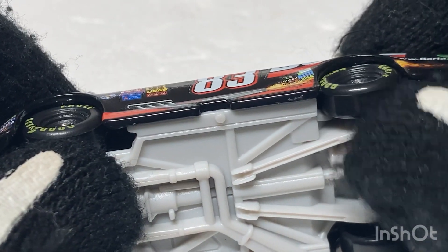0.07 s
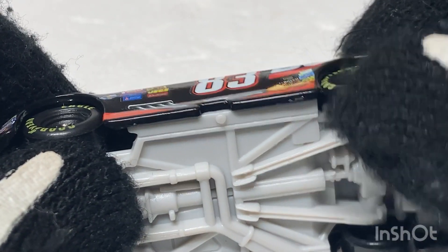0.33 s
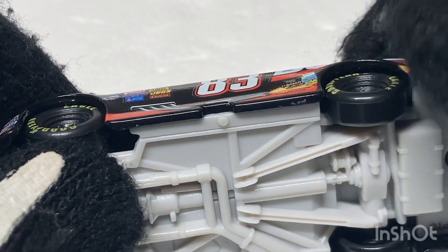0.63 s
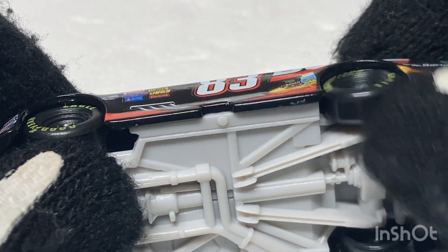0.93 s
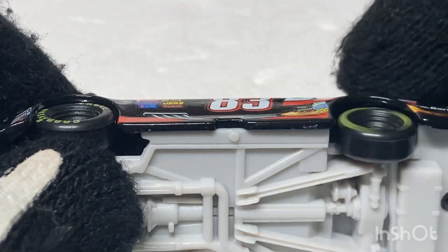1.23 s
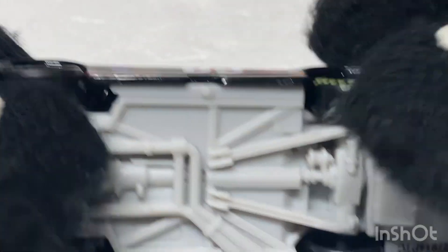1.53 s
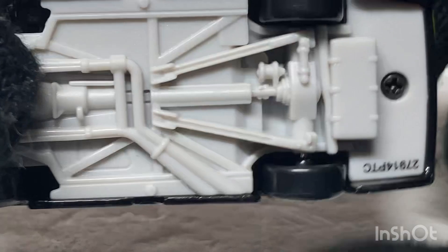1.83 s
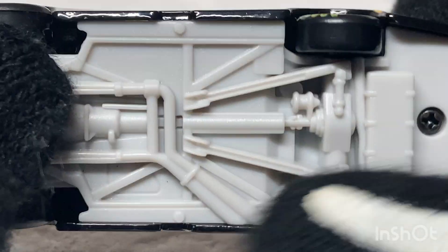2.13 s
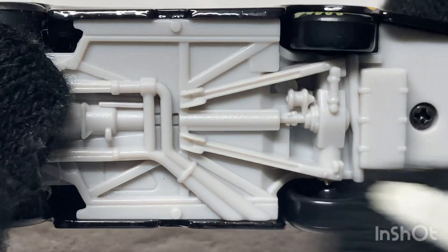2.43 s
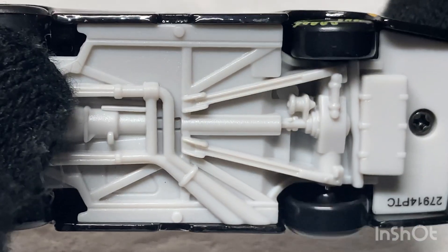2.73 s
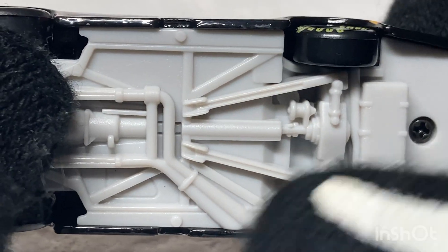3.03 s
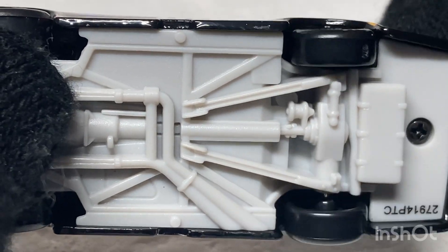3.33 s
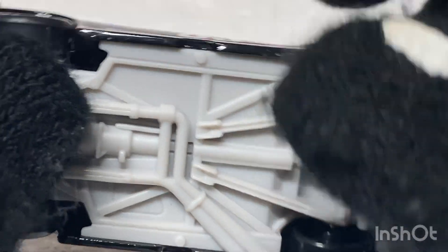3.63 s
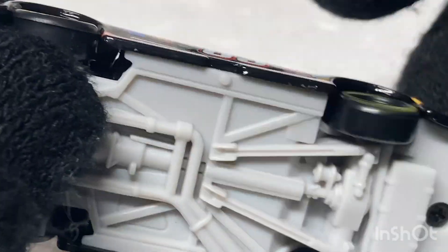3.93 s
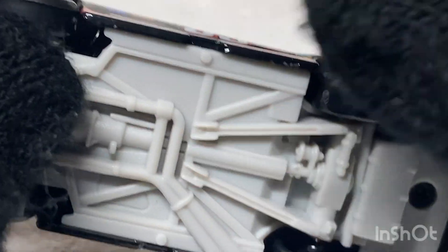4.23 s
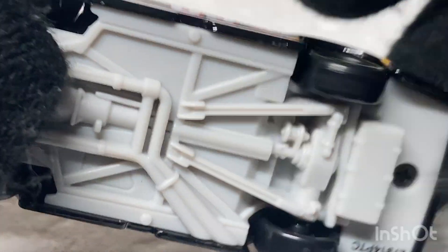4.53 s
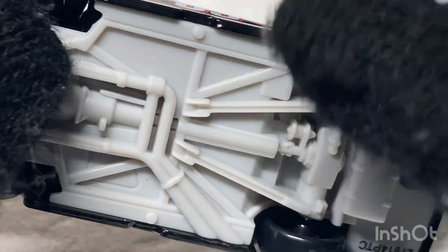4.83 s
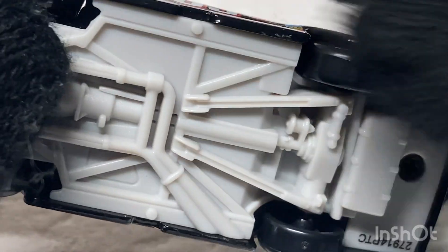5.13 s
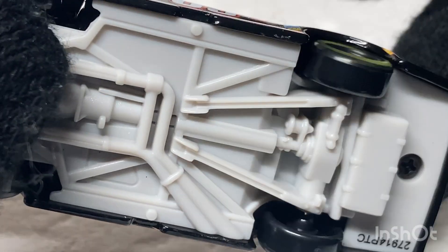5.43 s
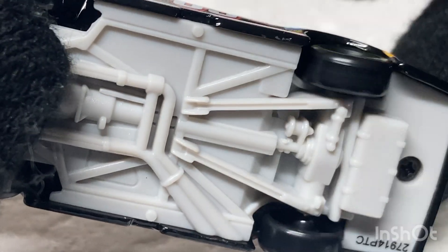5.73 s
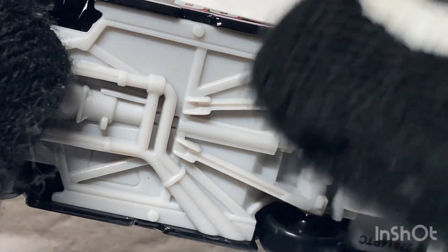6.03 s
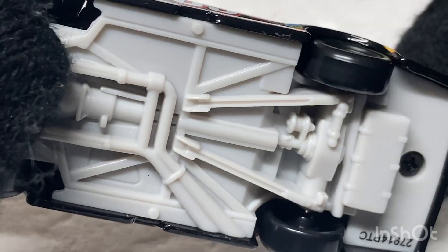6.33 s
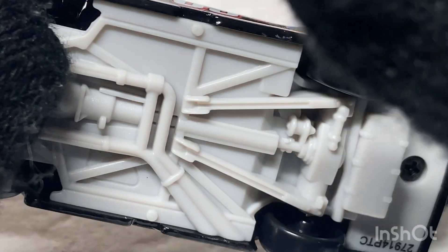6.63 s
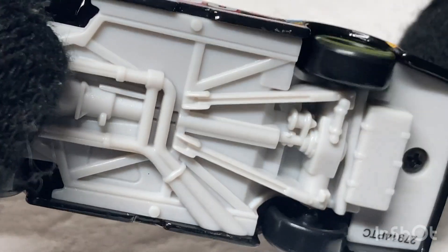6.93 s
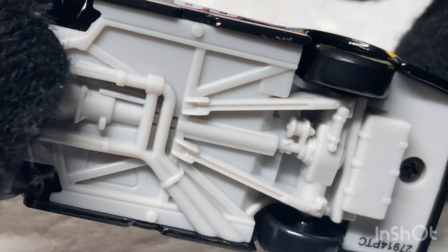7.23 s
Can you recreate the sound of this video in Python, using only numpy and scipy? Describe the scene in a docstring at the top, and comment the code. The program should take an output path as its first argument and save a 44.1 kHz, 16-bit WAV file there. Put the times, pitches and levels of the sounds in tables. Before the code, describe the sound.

A small metal toy car is handled close to the microphone in a small room with a faint, steady low hum. In the first second, knit gloves scuff faintly and a loose axle gives a few light clicks. At about 1.1 seconds a finger flicks a plastic wheel, making a sharp double clack and a very brief rattle. A glove brushes softly over the body around 1.6 seconds. Three gentler flicks follow at 2.1, 2.5 and 3.1 seconds, each spinning down in a fine, ticking rattle lasting about half a second. After another soft brush, louder flicks come at 3.8, 4.4, 4.9, 5.2, 5.7, 6.1 and 6.8 seconds. Each has a bright clack with quick rebounds, a soft low hand thud and a short fading rattle, with stray axle clicks between. The last spin runs down at about 7.3 seconds.

```python
"""Flicking the wheels of a toy car

A small room with a faint hum; a phone's two microphones stand close to a die-cast car in gloved hands.
Again and again a finger catches a plastic wheel and lets go: the loose axle clacks and rebounds, the
hand thuds softly, and the wheel spins with a fine rattle and runs down. Knit gloves brush the body."""
import sys
import numpy as np
from scipy import signal
from scipy.fft import rfft, irfft, next_fast_len
from scipy.io import wavfile
from scipy.ndimage import uniform_filter1d, map_coordinates

SR = 44100
rng = np.random.default_rng(int(sys.argv[2]) if len(sys.argv) > 2 else 0)


def wrap_up_sound(samples):
    """Save the sound to the file named by the first command line argument, as 16-bit audio."""
    columns = np.atleast_2d(samples).T
    # keep every value between -1 and 1, then stretch to whole-number steps
    tamed = np.clip(columns, -1, 1)
    steps = np.round(tamed * 32767).astype(np.int16)
    wavfile.write(sys.argv[1], SR, steps)


N = 321003
T = np.arange(N) / SR

# Levels in the tables are relative; each layer sets its own gain.
# The room's hum. Each row: frequency in Hz, level in dB.
HUM_TONES = [(87.2, -74), (174.3, -60)]
# Noise spectra. Each row: frequency in Hz, spectral density in dB.
ROOM_TONE_SPECTRUM = [(20, -25.5), (45, -10.5), (80, 1.5), (130, -0.5), (210, -3), (300, -5.5), (420, -14),
                      (600, -15), (900, -29.5), (1500, -33), (3000, -37.5), (6000, -43), (11000, -39.5),
                      (16000, -49.5)]
KNIT_SPECTRUM = [(250, -25.5), (450, 5), (650, 4.5), (1000, -2), (1300, -2.5), (1650, 1.5), (2200, -4.5),
                 (4000, -7.5), (6000, -11.5), (8000, -8.5), (12000, -7.5), (16000, -13.5)]
SCUFF_SPECTRUM = [(600, -22), (1400, 15.5), (2300, 21), (4200, -1), (5500, -21), (12000, -8), (16000, -35)]
THUD_SPECTRUM = [(20, -42), (33, -17), (48, -0.5), (75, 1), (120, -11), (240, -8.5), (400, -44),
                 (1000, -84.5)]
# Room tone across the microphones. Each row: frequency in Hz, left-right correlation.
ROOM_TONE_LIKENESS = [(100, 0.88), (250, 0.72), (600, 0.64), (1500, .1), (8000, 0.19)]
# The fingers shift their grip. Each row: time in seconds, level in dB.
GRIP_LEVELS = [(0.0, -66.5), (0.268, -62.5), (0.412, -73), (0.7, -89)]
# A glove strokes the body. Each row: middle in seconds, half length in seconds, level in dB.
GLOVE_STROKES = [(1.581, 0.13, -54), (2.07, 0.046, -69.5), (3.028, 0.041, -76), (3.708, .055, -58.5),
                 (4.385, 0.047, -69.5)]
# The loose axle clacks as the car tilts or a wheel wobbles.
# Each row: time in seconds, level in dB, treble over body in dB.
AXLE_CLACKS = [(0.0338, -51.5, -24), (0.1572, -59.5, -22), (0.239, -52, -22), (0.3704, -40.5, -10.5),
               (0.406, -51, -1), (0.726, -38, -1.5), (0.9195, -27.5, 6), (0.9496, -30.5, 6),
               (1.0027, -38, -10), (1.0125, -32.5, 9), (1.0187, -36, 3), (1.2246, -43.5, -8),
               (1.3317, -40.5, -1.5), (2.2303, -35.5, 6.5), (2.3707, -32, 4.5), (2.4519, -40.5, 7.5),
               (2.5785, -39, 13), (2.6445, -34.5, 6.5), (2.6851, -39.5, 4), (2.905, -50, 4),
               (2.9239, -47.5, -1.5), (3.0976, -38, -5.5), (3.1149, -32.5, 7), (3.1631, -39, 4),
               (3.3478, -46.5, 2), (4.6144, -44.5, 0), (4.9716, -37, 1.5), (5.36, -35.5, 3),
               (5.7409, -32, 6.5), (5.8685, -39.5, 13), (6.1127, -21.5, 7.5), (6.1672, -37.5, 6),
               (6.8773, -35.5, 11), (6.9008, -31.5, 5.5), (7.172, -46.5, 6)]
# A fingertip drags. Each row: middle in seconds, half length in seconds, pitch in Hz, level in dB.
FINGER_DRAGS = [(0.313, 0.022, 746, -68.5), (1.673, 0.052, 652, -58.5), (1.605, 0.082, 1650, -68.5),
                (3.087, 0.026, 1306, -65), (3.732, .04, 774, -66.5), (4.371, 0.018, 635, -65)]
# The shell is knocked. Each row: time in seconds, level of the hollow in dB, level of the rim in dB.
SHELL_KNOCKS = [(0.7244, -42, -61), (0.921, -50, -34.5), (0.9501, -39.5, -54), (1.0005, -57, -46.5),
                (1.019, -61, -44), (1.1337, -40, -45.5), (1.1632, -54, -37.5), (1.224, -49, -47.5),
                (1.3329, -45.5, -59), (2.136, -53.5, -38), (3.135, -60, -53), (5.233, -54, -28)]
# A finger flicks a wheel. Each row: catch in seconds, its level in dB, release in seconds, its level in
# dB, rebound gap in seconds, loss per rebound in dB, treble over body in dB, spin length in seconds,
# rattle level in dB, metal ring over rattle in dB, hand thud in dB.
WHEEL_FLICKS = [(1.1318, -21, 1.1655, -21, 0.0077, 7, 4, .18, -46.5, -6, -58),
                (2.137, -33.5, 2.1791, -24.5, 0.0063, 3, 7, 0.55, -53.5, -2, -75),
                (2.548, -29, 2.5959, -32, .0235, 17, 0.5, 0.51, -57.5, -3, -62.5),
                (3.134, -33.5, 3.1812, -30.5, 0.028, 20, 4.5, 0.52, -56, -1, -64),
                (3.8074, -16.5, 3.8476, -21, .0063, 4, 8.5, .38, -46, -25, -61),
                (4.4298, -19, 4.4847, -19.5, 0.015, 4, 8.5, 0.25, -52, -20, -61.5),
                (4.8696, -21.5, 4.8987, -21, 0.034, 11.5, 6, 0.28, -51, -12, -56),
                (5.2318, -16.5, 5.255, -27, .0115, 7, 9, 0.46, -45, -25.5, -56),
                (5.6621, -17.5, 5.678, -27, 0.0076, 3.5, 9.5, 0.44, -45, -24.5, -58.5),
                (6.0743, -21, 6.1017, -22.5, .0058, 6.5, 7, 0.43, -46, -17, -57),
                (6.815, -20, 6.8375, -26, 0.0053, 1.6, 9, 0.47, -46, -27, -54.5)]
# The car's resonances. Each row: frequency in Hz, width in Hz, level in dB, left over right in dB.
CHASSIS_MODES = [(1378, 125, 4.5, 8.5), (2043, 230, 4, 2), (2583, 220, 4, 5.5), (2854, 280, 1, 16),
                 (3740, 220, -4, -8.5), (3846, 150, 5.5, 6.5), (4530, 790, -1.5, 13), (4753, 53, 5.5, -6.5)]  # the plastic chassis, struck
WHEEL_MODES = [(6000, 130, -7, -19.5), (7180, 1700, 8, 2.5), (8070, 420, -1, -21.5), (8900, 970, -9.5, -8),
               (10420, 1600, 0.5, 0), (12070, 2600, -1.5, -1), (15300, 270, -10, -10.5)]  # wheel and axle
HOLLOW_MODES = [(251, 39, 11.5, 0), (570, 77, 8, 4), (870, 310, 0, 10), (1254, 650, -1, -10)]  # the air under the shell
RIM_MODES = [(3940, 270, -1.5, 9), (4320, 150, -2, 4.5)]  # the thin metal rim
ROLLING_MODES = [(1435, 82, 6, 6.5), (2036, 110, -1, 8.5), (2300, 270, -2.5, 7), (2540, 240, 1.5, 7.5),
                 (2830, 240, -5, 12.5), (3620, 190, -1.5, 4), (3800, 150, -6, 10.5), (4260, 300, -4.5, 5.5),
                 (4760, 340, -4.5, 7), (5350, 710, -8.5, 3)]  # the chassis, kept ringing by a rolling wheel
SHELL_MODES = [(2654, 85, -3.5, -0.5), (3000, 140, 1.5, 20), (4007, 130, 2.5, 4), (4450, 600, -1.5, 7.5),
               (6800, 1300, -3, 7.5)]  # the die-cast shell
# Path difference from the car to the microphones. Each row: frequency in Hz, left lead in radians.
MIC_PHASE = [(100, 0), (800, -.7), (1400, 2), (2050, 3.8), (2600, 4.2), (3600, 1.3), (4100, .2),
             (5000, -2.9), (6000, -5.1), (6950, -6.3), (15800, -18.9)]
# The small room's decay. Each row: frequency in Hz, time to fall 60 dB in seconds.
ROOM_T60 = [(200, 0.26), (1500, 0.27), (6000, 0.14), (15000, 0.054)]


def amp(db):
    """Decibels to gain."""
    return 10 ** (np.asarray(db) / 20)


def unit(x):
    """x scaled to rms 1."""
    return x / np.sqrt(np.mean(np.abs(x) ** 2) + 1e-30)


def along(points, hz):
    """(Hz, value) points read on a log frequency axis."""
    freqs, values = np.transpose(points)
    return np.interp(np.log(hz + 1), np.log(freqs + 1), values)


def wobble(rate):
    """A smooth random curve, rate knots a second."""
    return map_coordinates(rng.standard_normal(int(N * rate / SR) + 4), [T * rate])


def filtered(x, response):
    """x through a complex frequency response."""
    size = next_fast_len(N + 8192, True)
    return irfft(rfft(x, size) * response(np.fft.rfftfreq(size, 1 / SR)), size)[..., :N]


def noise(spectrum):
    """Coloured noise of rms 1."""
    return unit(filtered(rng.standard_normal(N), lambda hz: amp(along(spectrum, hz))))


def resonate(x, modes, low_hz, high_hz):
    """x rings the modes within a band; each radiates differently to the left and right microphone."""
    hz = np.fft.rfftfreq(4096, 1 / SR)
    power = sum(amp([[db + pan / 2], [db - pan / 2]]) ** 2 / (1 + (2 * (hz - centre) / width) ** 2)
                for centre, width, db, pan in modes)
    band = 1 / (1 + (low_hz / (hz + 1)) ** 16) / (1 + (hz / high_hz) ** 8)
    # minimum phase, so the ring follows the blow
    cepstrum = irfft(np.log(unit(np.sqrt(power * band)) + 1e-3))
    half = len(hz) - 1
    fold = np.r_[1, np.full(half - 1, 2), 1, np.zeros(half - 1)]
    ring = irfft(np.exp(rfft(cepstrum * fold)))
    return signal.fftconvolve(x[None], ring, axes=1)[:, :N]


def blows(times, sizes):
    """Energy of contacts, sample by sample; a size is the rms over 2.5 ms."""
    index = np.clip(np.round(times * SR).astype(int), 0, N - 1)
    return np.bincount(index, sizes ** 2, N) * SR * .0025


def chatter(energy, crack_t60, ring_t60, ring_db, lead_t60=0.0096, lead_db=-13):
    """Each contact is a brief soft swell just before a crack of micro-impacts, then a longer buzz."""
    def fade(x, t60):
        keep = amp(-120 / (t60 * SR))
        return signal.lfilter([1 - keep], [1, -keep], x)
    swell = amp(lead_db) ** 2 * fade(energy[::-1], lead_t60)[::-1]
    power = swell + fade(energy, crack_t60) + amp(ring_db) ** 2 * fade(energy, ring_t60)
    # the force builds up over a fraction of a millisecond
    return np.sqrt(np.abs(uniform_filter1d(power, size=20))) * rng.standard_normal(N)


def room_tone():
    """A faint hum over low room noise, whose bass is nearly alike at both microphones."""
    def mid_side_gains(hz):
        angle = np.arccos(np.clip(along(ROOM_TONE_LIKENESS, hz), -1, 1)) / 2
        return np.array([np.cos(angle), np.sin(angle)])
    hum = sum(amp(db + .8 * wobble(2.6)) * np.sqrt(2) * np.sin(2 * np.pi * hz * T + 0.14 * wobble(4.8))
              for hz, db in HUM_TONES)
    air = np.array([noise(ROOM_TONE_SPECTRUM), noise(ROOM_TONE_SPECTRUM)])
    mid, side = filtered(air, mid_side_gains)
    return hum * amp([[-1.1], [1.1]]) + amp(-60) * unit(np.array([mid + side, mid - side]))


def gloves():
    """Knit fibres brush the paint: a grainy hiss swells with each stroke, and a shifting grip scuffs."""
    brush = noise(KNIT_SPECTRUM) + 2.8 * np.array([noise(KNIT_SPECTRUM), noise(KNIT_SPECTRUM)])
    scuff = noise(SCUFF_SPECTRUM) * amp([[2.5], [-2.5]])
    brush = unit(brush * amp(2 * wobble(250)))
    scuff = unit(scuff * amp(7.5 * wobble(130)))
    strokes = sum(amp(db) * np.exp(-.5 * np.abs((T - middle) / half) ** 2.8)
                  for middle, half, db in GLOVE_STROKES)
    grip = amp(np.interp(T, *np.transpose(GRIP_LEVELS), right=-150))
    return strokes * brush + amp(-5) * grip * scuff


def axle_clacks(contacts, scatter_db=2.5):
    """The axle hits its slot: the wheel ticks, the chassis rings longer, the hollow answers faintly."""
    times, db, treble_db = np.transpose(contacts)
    body_size = amp(db) / np.sqrt(1 + amp(treble_db) ** 2)
    # a softer contact favours the low modes, and no two contacts strike quite the same spot
    low_ratio = amp(-5 - .35 * treble_db + scatter_db * rng.standard_normal(N)[:len(times)])
    high_size = body_size / np.sqrt(1 + low_ratio ** 2)
    knock, clack = [
        chatter(blows(times, size), crack_t60=0.007, ring_t60=0.048, ring_db=-6.5,
                lead_t60=0.012, lead_db=-14)
        for size in (high_size * low_ratio, high_size)]
    tick = chatter(blows(times, body_size * amp(treble_db)), crack_t60=0.0089, ring_t60=0.029,
                   ring_db=-10.5, lead_t60=0.0079, lead_db=-17)
    return (amp(1.2) * resonate(knock, CHASSIS_MODES, low_hz=1170, high_hz=2180)
            + amp(-0.7) * resonate(clack, CHASSIS_MODES, low_hz=2260, high_hz=6000)
            + amp(-2.34) * resonate(tick, WHEEL_MODES, low_hz=4507, high_hz=19000)
            + amp(-20) * resonate(knock, HOLLOW_MODES, low_hz=402, high_hz=616))


def finger_drags(sharpness=6):
    """A dragging fingertip wakes one narrow resonance in a soft swell of noise."""
    out = np.zeros(N)
    for middle, half, pitch, db in FINGER_DRAGS:
        band = filtered(rng.standard_normal(N), lambda hz: 1 / (1 + (sharpness * (hz / pitch - 1)) ** 2))
        out += amp(db) * np.exp(-.5 * ((T - middle) / half) ** 2) * unit(band)
    return out


def shell_knocks():
    """Knocks wake the air space inside the car and ping the rim of its metal shell."""
    times, hollow_db, rim_db = np.transpose(SHELL_KNOCKS)
    push = chatter(blows(times, amp(hollow_db)), crack_t60=0.057, ring_t60=0.14, ring_db=1)
    ping = chatter(blows(times, amp(rim_db)), crack_t60=0.019, ring_t60=0.067, ring_db=-3.5)
    return (amp(-0.5) * resonate(push, HOLLOW_MODES, low_hz=202.3, high_hz=1597)
            + amp(-2.3) * resonate(ping, RIM_MODES, low_hz=3000, high_hz=5500))


def flick_contacts(play_s=.0038, settle_s=.0083, bounces=5):
    """The catch slams the axle across its play; the release lets it rebound. Rows as in AXLE_CLACKS."""
    bounce, rows = np.arange(bounces), []
    for catch, catch_db, release, release_db, gap, loss_db, treble_db, *_ in WHEEL_FLICKS:
        rows += [(catch - play_s, catch_db - 7.5, treble_db),  # touches
                 (catch, catch_db, treble_db),  # slams home
                 (catch + settle_s, catch_db - 12, treble_db)]  # settles
        late, colour = rng.standard_normal((2, bounces)) * (bounce > 0)
        times = release + gap * (bounce + .12 * late)
        rows += zip(times, release_db - loss_db * bounce, treble_db + 3 * colour)
    return rows


def wheel_spin(start_turn_hz=40, scatter_db=5, duller_db=9.5):
    """The wheel rattles on its axle in tiny uneven contacts; friction slows it evenly."""
    speed, level, treble, metal, held = np.zeros((5, N))
    for catch, _, release, *_, treble_db, length, rattle_db, metal_db, _ in WHEEL_FLICKS:
        free = (T >= release) & (T < release + length)
        speed[free] = 1 - (T[free] - release) / length
        level[free], treble[free], metal[free] = amp([rattle_db, treble_db - duller_db, metal_db])
        held += amp(rattle_db) * ((T > catch) & (T < release))  # rolling under the finger
    # the contacts swell slightly once a turn and thin out as the wheel slows
    turn = np.sin(2 * np.pi * np.cumsum(start_turn_hz * np.sqrt(speed)) / SR + 0.78 * wobble(21))
    contacts_per_s = 440 * (.4 + speed)
    touches = rng.random(N) < contacts_per_s / SR
    size = np.minimum(rng.standard_normal(N), 1.8)
    energy = touches * amp(scatter_db * size + 0.5 * turn) ** 2
    # the rattle's mean power follows the wheel, whatever the single contacts do
    energy /= np.abs(uniform_filter1d(energy, size=1500)) + 1e-6
    buzz = chatter(energy, crack_t60=.004, ring_t60=0.027, ring_db=-1)
    crackle = chatter(energy, crack_t60=.004, ring_t60=0.017, ring_db=-3.5)
    chassis = unit(resonate(buzz, ROLLING_MODES, low_hz=1250, high_hz=6000))
    shell = unit(resonate(buzz, SHELL_MODES, low_hz=2470, high_hz=8600))
    wheel = unit(resonate(crackle, WHEEL_MODES, low_hz=4485, high_hz=20060))
    # a faster wheel sounds louder and brighter
    spinning = level * speed ** 0.97 * (chassis + metal * shell + treble * speed ** 0.6 * wheel)
    return amp(-1) * spinning + amp(-5.5) * held * (chassis + amp(-2) * wheel)


def hand_thuds(lag_s=.032, half_length_s=.029):
    """The passing hand thuds low and soft after each flick; so does the palm as it takes a new hold."""
    palm_s, palm_db = 1.232, -54.5
    thuds = [(palm_s, palm_db)] + [(release + lag_s, db) for _, _, release, *_, db in WHEEL_FLICKS]
    push = sum(amp(db) * np.exp(-.5 * ((T - middle) / half_length_s) ** 2) for middle, db in thuds)
    rumble = noise(THUD_SPECTRUM)
    running_rms = np.sqrt(np.abs(uniform_filter1d(rumble ** 2, size=3000)) + 1e-6)
    return amp(2.5) * push * rumble / running_rms


def wobble_ticks(ticks_per_s=20, scatter_db=3):
    """A spinning wheel wobbles and ticks above its rattle, softer as it slows. Rows as in AXLE_CLACKS."""
    rows = []
    for _, _, release, *_, length, rattle_db, _, _ in WHEEL_FLICKS:
        age = np.cumsum(rng.uniform(0.33, 1.7, size=24)) / ticks_per_s
        loud, colour = rng.standard_normal((2, len(age)))
        speed = np.clip(1 - age / length, 1e-6, 1)
        db = rattle_db + 3 + scatter_db * loud + 20 * np.log10(speed ** 0.84)
        rows += list(np.column_stack([release + age, db, -0.5 + 5 * colour])[age < length])
    return rows


def table_top(x, t60=0.026):
    """Hands and table scatter a few milliseconds of reflections, unlike at the two microphones."""
    t = np.arange(SR // 16) / SR
    scatter = rng.standard_normal((2, len(t))) * amp(-60 * t / t60) * (t > .001)
    scatter /= np.linalg.norm(scatter, axis=1, keepdims=True)
    near = signal.fftconvolve(x, scatter, axes=1)[:, :N]
    # the gloves swallow the treble
    return filtered(near, lambda hz: amp(along([(1200, 0), (4500, -3.5), (7000, -5.5), (15000, -8.5)], hz)))


def room_tail(x):
    """The small room returns a short diffuse tail, different at each microphone."""
    hz, t, spectra = signal.stft(rng.standard_normal((2, SR // 2)), SR, nperseg=256)
    decay = amp(-60 * t / along(ROOM_T60, hz)[:, None])
    tail = signal.istft(spectra * decay, SR, nperseg=256)[1]
    tail = np.pad(tail, ((0, 0), (128, 0)))  # about 3 ms behind the direct sound
    return signal.fftconvolve(x, tail / np.linalg.norm(tail[0]), axes=1)[:, :N]


def scene():
    """The close car reaches the two microphones by different paths; table and room answer faintly."""
    def mic_paths(hz):
        left_lead = np.interp(hz, *np.transpose(MIC_PHASE))
        return np.exp(.5j * left_lead * np.array([[1], [-1]]))
    contacts = AXLE_CLACKS + flick_contacts() + wobble_ticks()
    car = axle_clacks(contacts) + shell_knocks() + wheel_spin() + gloves() + finger_drags()
    reflections = amp(-9) * table_top(car) + amp(-15) * room_tail(car)
    return filtered(car, mic_paths) + reflections + hand_thuds() + room_tone()


def record(dry):
    """The phone cuts off steeply above its band limit."""
    top_hz = 16000
    return filtered(dry, lambda hz: 1 / np.sqrt(1 + (hz / top_hz) ** 160))


dry = scene()
out = record(dry)
wrap_up_sound(out)
```